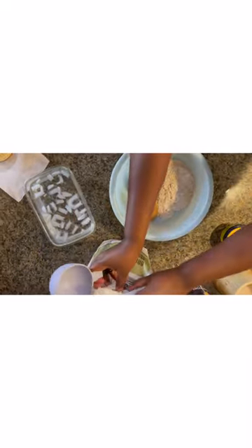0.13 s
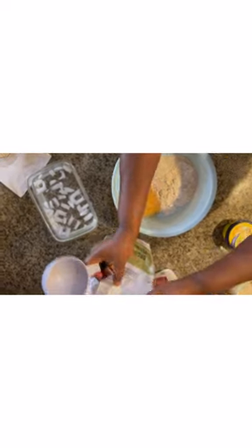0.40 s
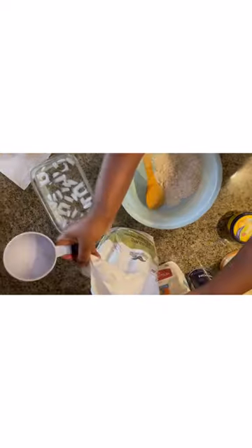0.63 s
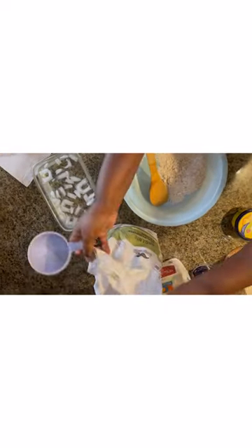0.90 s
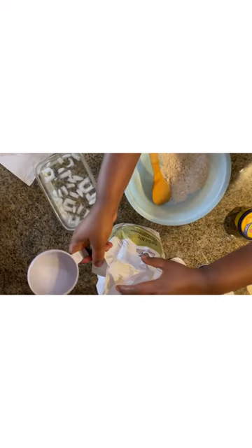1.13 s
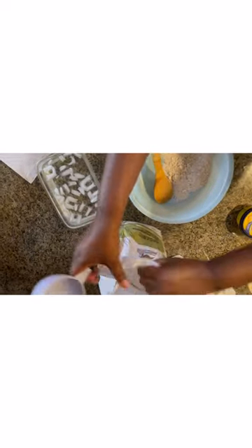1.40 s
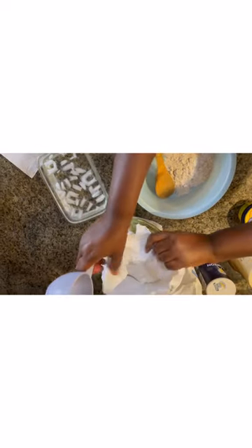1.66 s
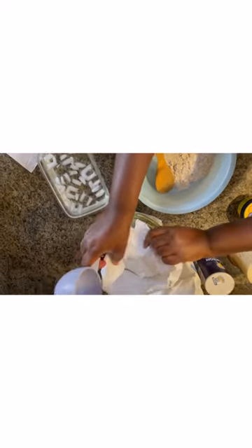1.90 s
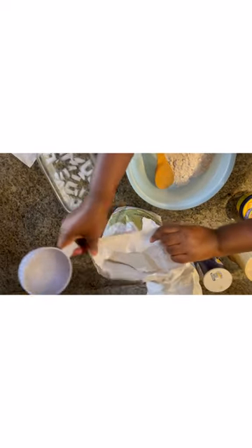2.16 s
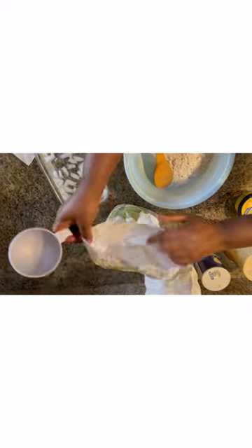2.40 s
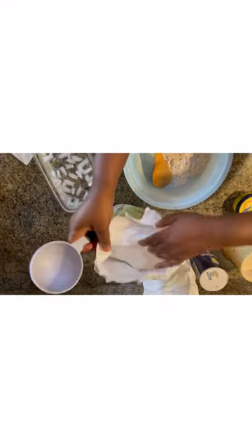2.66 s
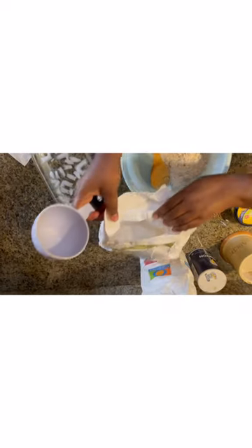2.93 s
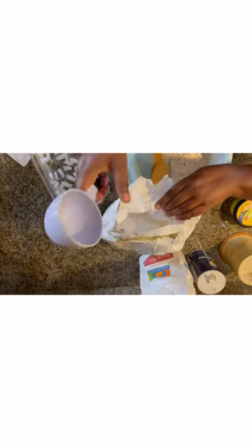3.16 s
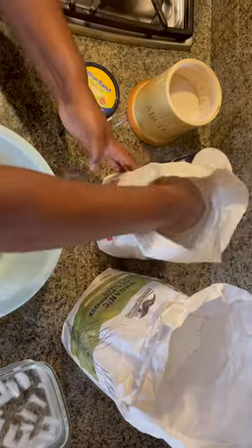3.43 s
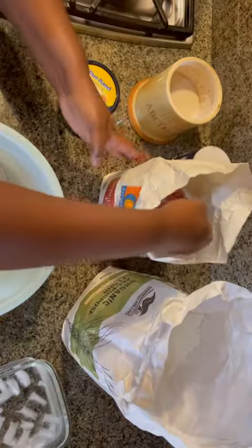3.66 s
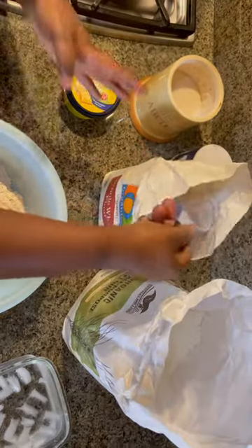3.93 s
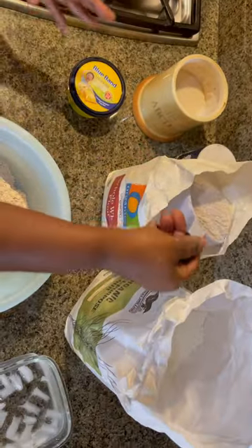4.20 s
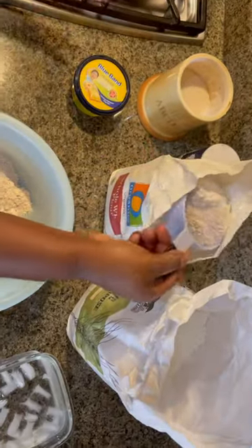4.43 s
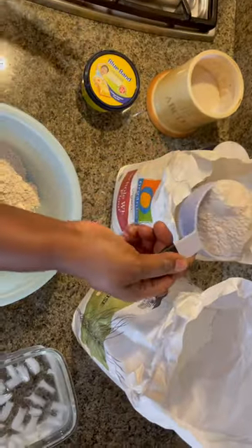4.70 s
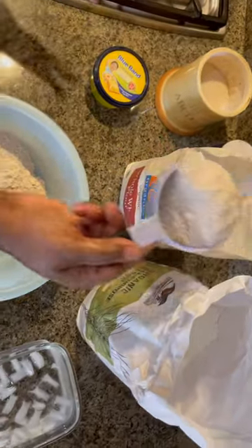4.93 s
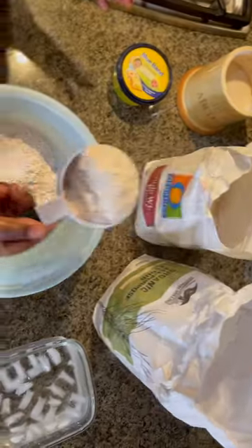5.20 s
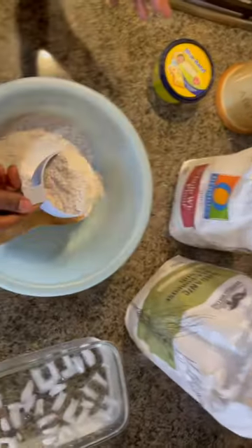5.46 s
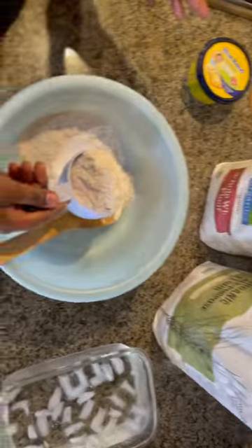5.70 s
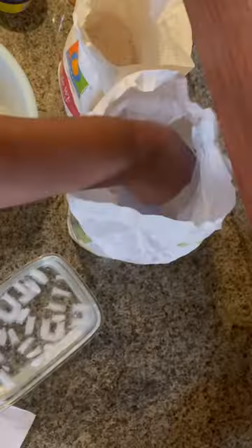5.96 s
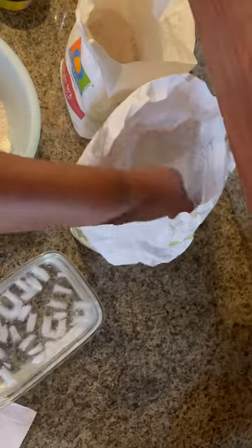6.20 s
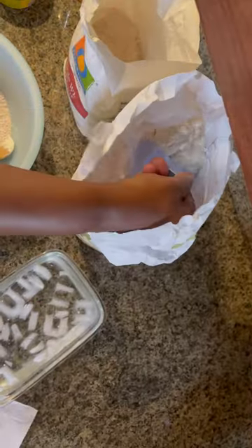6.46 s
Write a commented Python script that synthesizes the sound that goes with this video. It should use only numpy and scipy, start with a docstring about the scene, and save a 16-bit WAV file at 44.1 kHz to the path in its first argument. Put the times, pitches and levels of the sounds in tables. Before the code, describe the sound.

Close, crisp crinkling of stiff paper bags in bursts, thinning to near silence, then a brief return of rustling as a hand digs in again.

```python
"""Hands in paper flour bags

Hands open and dig into paper flour bags on a stone counter in a kitchen, in three shots joined by hard cuts.
Creases snap and panels of paper pop (brief decaying tones) over a dense rustle (noise in bands, made grainy).
A cup ticks once (a graze rings its modes), flour and fingers rub softly (puffs of noise), an appliance hums.
Faint gliding tones come and go. Two close microphone ports hear it, falling out of phase in the top octave."""
import sys
import numpy as np
from scipy import signal
from scipy.fft import rfft, irfft, next_fast_len
from scipy.io import wavfile

SR = 44100
rng = np.random.default_rng(int(sys.argv[2]) if len(sys.argv) > 2 else 0)


def field_ratio(decibels):
    """Amplitude ratio for a level in dB (20 dB per decade); scalars and array-likes work."""
    return 10 ** (np.asarray(decibels, dtype=float) / 20)


def store_pcm(level_fs):
    """Save levels as 16-bit WAV."""
    pcm = np.round(np.clip(level_fs, -1, 1) * 32767).astype(np.int16)
    wavfile.write(sys.argv[1], SR, np.atleast_2d(pcm).T)


N = 290619

CUTS_S = 3.281, 5.918   # where the second and third shot begin
TEAR_S = 0.0025   # how long the slips of one snap last
# Snaps of the paper. Each row: time in seconds, level of the crease in relative dB,
# pitch of the popping panel in Hz, level of the pop in relative dB, level of the high crack in relative dB.
SNAPS = [(0.077, -15, 153, -36, -40), (0.096, -17, 177, -24, -35), (0.138, -13.5, 990, -28.5, -34.5),
         (0.231, -24.5, 690, -49, -43.5), (0.283, -12.5, 157, -28, -27.5), (0.396, -23.5, 1060, -47, -43.5),
         (0.455, -10, 1000, -24.5, -17), (0.471, -9.5, 1020, -20, -20), (0.482, -10.5, 145, -26.5, -27.5),
         (0.53, -18.5, 287.6, -24.5, -34), (0.557, -26, 960, -23.5, -39), (0.571, -5, 980, -25.5, -20.5),
         (0.631, -18, 900, -47.5, -28), (0.639, 0, 636, -20, -22), (0.693, -5, 617, -16.5, -12),
         (0.709, -20, 580, -31, -43), (0.738, -11.5, 850, -10.5, -60), (0.86, -21, 674, -24, -65),
         (1.281, -26, 700, -28, -45.5), (1.291, -17, 680, -34, -27), (1.363, -24.5, 385, -33, -39.5),
         (1.396, -27, 603, -28.5, -62), (1.405, -25, 380, -23.5, -65), (1.425, -21, 680, -28.5, -38.5),
         (1.525, -13, 317, -26, -26.5), (1.441, -29, 448, -34.5, -47), (1.475, -45, 327, -30.5, -43),
         (1.594, -15, 1100, -32, -63), (1.609, -8, 1280, -34, -64), (1.619, -27, 890, -36, -45),
         (1.896, -24.5, 183, -29, -38), (1.947, -25, 800, -21.5, -68), (1.959, -19.5, 888, -46, -52.5),
         (1.983, -17, 377, -29, -42.5), (2.018, -26.5, 730, -27, -27.5), (2.045, -49.5, 62, -37, -66),
         (2.078, -12, 1260, -39, -43.5), (2.099, -9, 1065, -27, -40.5), (2.156, -13, 155, -28, -17),
         (2.167, -8.5, 650, -28.5, -52.5), (2.209, -20, 295, -32, -69), (2.25, -20, 686, -17.5, -51.5),
         (2.263, -9, 620, -22.5, -19), (2.496, -17.5, 490, -32, -56), (2.516, -31.5, 397, -38, -56.5),
         (2.578, -14.5, 920, -36.5, -34), (2.586, -10, 930, -25.5, -37), (2.716, -20.5, 960, -37, -40),
         (2.793, -32, 320, -34, -91), (2.807, -30.5, 687, -26.5, -96), (2.918, -12, 1060, -29, -69),
         (3.035, -38, 151.1, -45.5, -55), (3.281, -14.5, 316, -27.5, -33.5), (3.307, -7, 580, -16, -41.5),
         (3.334, -11, 1000, -19.5, -17), (3.405, -8.5, 264, -16.5, -62), (3.506, -11, 890, -31.5, -35),
         (3.562, -14.5, 660, -27, -79), (3.652, -22, 563, -33.5, -30.5), (3.679, -23, 270, -30, -83),
         (3.735, -54, 696, -42, -58), (3.883, -24, 675, -31.5, -50), (3.891, -30, 912, -39, -47.5),
         (4.25, -34, 313, -38.5, -55), (4.526, -22, 760, -43, -33), (4.544, -19, 818, -23.5, -43.5),
         (4.56, -48, 62, -41, -72), (4.317, -35, 810, -41, -51), (4.377, -47, 910, -55, -56),
         (4.718, -59, 600, -61, -57.5), (4.786, -38, 750, -66, -65), (4.854, -44.5, 196.1, -44.5, -40),
         (5.499, -45, 200, -66, -56), (5.568, -60, 158.2, -64, -65), (5.713, -42, 603, -64, -78),
         (5.856, -57.5, 239, -60, -92), (6.09, -49, 710, -49, -67), (6.179, -24, 363, -26, -67),
         (6.204, -10.5, 272, -23, -25.5), (6.28, -25, 540, -37, -75), (6.345, -42, 400.2, -36, -61),
         (6.505, -42, 690, -32.5, -58)]


def rms_one(x):
    """Scale a sound so that its average power is 1."""
    return x / np.sqrt(np.mean(x ** 2) + 1e-20)


def in_time(rows):
    """Join the rows of a table by straight lines: the first column is time, the others are returned."""
    s, *columns = np.transpose(rows)
    return [np.interp(np.arange(N) / SR, s, column) for column in columns]


def at_hz(points, hz):
    """Read a table at a pitch, on a log-frequency axis."""
    table_hz, values = np.array(points).T
    return np.interp(np.log(hz), np.log(table_hz), values)


def fade(clicks, t60):
    """Each click starts an exponential decay that falls by 60 dB in t60 seconds."""
    return signal.lfilter([1], [1, -field_ratio(-60 / (t60 * SR))], clicks + 1e-18)


def coloured(x, spectrum):
    """Smooth colouring by a table of gains in dB on a log-frequency axis."""
    size = next_fast_len(N + 4096)
    hz = np.maximum(np.fft.rfftfreq(size, 1 / SR), 1)
    return irfft(rfft(x, size) * field_ratio(at_hz(spectrum, hz)), size)[..., :N]


def drift(rate):
    """Slow chance: random values, rate of them per second, with spread 1, joined by straight lines."""
    count = int(N * rate / SR) + 2
    return np.interp(np.arange(N) * rate / SR, np.arange(count), rng.standard_normal(count))


def arch(start, length):
    """A quick swell and fade over a stretch of time, both given in seconds."""
    progress = np.clip((np.arange(N) / SR - start) / length, 0, 1)
    return np.sqrt(np.maximum(np.sin(np.pi * progress), 0))


def per_shot(versions):
    """Join three versions, one for each shot, at the cuts."""
    return np.choose(np.searchsorted(CUTS_S, np.arange(N) / SR), versions)


def air():
    """The quiet of the kitchen: coloured noise that swells a little, partly different at the two ports."""
    # Colour of the quiet. Each row: frequency in Hz, level in relative dB.
    colour = [(18, -38), (30, -6), (76, -1.5), (169, -12.5), (240, -3), (333, -27.5), (1000, -38),
              (1500, -33), (2730, -41), (4990, -35.5), (8000, -40.5), (12000, -48), (15600, -73),
              (22000, -120)]
    level_db, swell_db = -65, 2.0
    mid, side = rng.standard_normal((2, N))
    quiet = rms_one(coloured(mid + 0.51 * side * [[1], [-1]], colour))
    return field_ratio(level_db + swell_db * drift(3.0)) * quiet


def hum():
    """A low appliance drone whose pitch and level waver, nearly alike at both ports."""
    pitch_hz, wander_hz = 64.8, 8.0
    level_db, waver_db = (-58.5, -60.5, -59), 4.0   # one level for each shot
    turns = 2 * np.pi * np.cumsum(pitch_hz + wander_hz * drift(12.0)) / SR
    tone = np.sin(turns) + 0.2 * drift(9.0) * np.cos(turns) * [[1], [-1]]
    return field_ratio(per_shot(level_db) + waver_db * drift(24.0)) * rms_one(tone)


def wisps():
    """Thin tones that come and go: a gliding carrier whose strength and phase wander, as in narrow noise."""
    # Faint tones, some under the rustle, most in the quiet. Each row: start in seconds, length in seconds,
    # first pitch in Hz, last pitch in Hz, rate of wandering in Hz, level in relative dB.
    tones = [(4.98, 0.36, 5100, 4850, 180, -81), (5.002, 0.486, 1520, 1420, 70, -80),
             (4.96, 0.138, 2470, 2500, 150, -87), (5.05, 0.18, 755, 720, 50, -84),
             (5.66, 0.15, 5450, 5400, 350, -84), (4.84, 0.17, 235, 230, 30, -60),
             (4.74, 0.11, 1800, 1950, 100, -64), (4.3, 0.1, 2150, 1800, 120, -60),
             (6.21, 0.3, 2000, 1980, 60, -57.5), (4.06, 0.14, 2050, 2100, 150, -62)]
    out, t = 0, np.arange(N) / SR
    for s, length, first_hz, last_hz, width_hz, db in tones:
        glide_hz = np.interp(t, [s, s + length], [first_hz, last_hz])
        turns = 2 * np.pi * np.cumsum(glide_hz) / SR
        tone = [drift(width_hz) * np.cos(turns) + drift(width_hz) * np.sin(turns) for _ in range(2)]
        out = out + field_ratio(db + 3.0 * drift(17.0)) * arch(s, length) * np.array(tone)
    return out


def kitchen(x):
    """Room echo: eight feedback delays a side, duller on every round."""
    t60_s, wall_cut_hz = 0.16, 1600   # decay time of the low pitches; above the cut the walls absorb more
    size = next_fast_len(N + SR)
    turn = -2j * np.pi * np.fft.rfftfreq(size, 1 / SR)
    dull = 1 / (1 - turn / (2 * np.pi * wall_cut_hz))
    out = np.zeros((2, len(turn)), complex)
    for k, lag in enumerate(rng.uniform(0.0064, 0.035, 16)):   # delays in seconds
        loop = field_ratio(-60 * lag / t60_s) * dull * np.exp(turn * lag)
        out[k % 2] += loop / (1 - loop) * (-1) ** (k // 2)
    return irfft(out * rfft(x, size), size)[:, :N]


def cup():
    """A short ragged graze, not a blow, rings the modes of the cup."""
    # Modes of the cup. Each row: pitch in Hz, level in relative dB, time to fall by 60 dB in seconds.
    modes = [(3160, -39, 0.042), (4000, -30.5, 0.047), (4030, -60, 0.18)]
    tick_s, touch_s = 4.846, 0.022
    t = np.arange(SR // 2) / SR
    fading = np.exp(-t / touch_s * 2) / np.sqrt(touch_s * SR / 4)
    graze = rng.standard_normal((len(modes), len(t))) * fading
    rung = 0
    for (hz, db, t60), push in zip(modes, graze):
        ringing = field_ratio(db - 60 * t / t60) * np.sin(2 * np.pi * hz * t)
        rung = rung + signal.fftconvolve(push, ringing)[:len(t)]
    return np.interp(np.arange(N) / SR - tick_s, t, rung, 0, 0)


def grain(per_s, spread_db, t60):
    """Envelope of small creases giving way at random, sizes with a long tail; average power 1."""
    sizes = field_ratio(spread_db * np.minimum(rng.exponential(1, N), 4.5))
    return rms_one(fade(sizes * (rng.random(N) < per_s / SR), t60))


def rubs():
    """Each rub is a puff of gritty noise in a band of its own."""
    # Short rubs, probably fingers, cup and flour sliding on paper. Each row: start in seconds,
    # length in seconds, low edge in Hz, high edge in Hz, level in relative dB.
    puffs = [(0.041, 0.082, 1000, 10100, -39.5), (0.423, 0.045, 5970, 11200, -31),
             (1.034, 0.025, 1500, 9958, -55), (1.074, 0.024, 1500, 10000, -50),
             (1.434, 0.039, 3000, 10500, -39), (1.55, 0.041, 7700, 10800, -37.5),
             (1.635, 0.048, 6960, 10800, -38.5), (1.838, 0.056, 3000, 10000, -46.5),
             (2.404, 0.03, 1000, 10000, -48.5), (2.53, 0.054, 4000, 10000, -48),
             (3.024, 0.053, 6800, 10900, -44.5), (3.866, 0.039, 500, 4500, -48),
             (4.06, 0.0705, 5000, 10500, -51), (4.226, 0.055, 1800, 10000, -52.5),
             (4.319, 0.077, 1790, 9900, -50.5), (4.753, 0.089, 1000, 10000, -58),
             (4.845, 0.026, 3000, 11420, -45), (5.085, 0.022, 9000, 11000, -78.5),
             (5.228, 0.015, 5010, 9050, -76), (5.286, 0.071, 198.9, 700, -63),
             (5.32, 0.025, 4010, 4900, -78), (5.345, 0.025, 1700, 3000, -72.5),
             (5.421, 0.0315, 5507, 8500, -78), (5.58, 0.055, 604, 2600, -73.5),
             (5.626, 0.15, 4796, 6220, -81)]
    grit_share = 0.4
    grit = 1 - grit_share + grit_share * grain(per_s=580.0, spread_db=3.5, t60=0.018)
    mid, side = rng.standard_normal((2, N)) * grit
    white = mid + 0.28 * side * [[1], [-1]]
    out = np.zeros((2, N))
    for s, length, low_hz, high_hz, db in puffs:
        i, j = int(s * SR), int((s + length) * SR) + 1
        sos = signal.butter(3, [low_hz, high_hz], "band", fs=SR, output="sos")
        band = signal.sosfilt(sos, white[:, i - 1000:j])[:, 1000:]   # the filter settles before the rub
        even = np.sqrt(SR / 2 / (high_hz - low_hz))   # wide and narrow bands equally strong
        out[:, i:j] += field_ratio(db) * band * even * arch(s, length)[i:j]
    return out


def pops():
    """A panel buckles: a few cycles at a pitch of its own, swelling in about one cycle."""
    out, t = np.zeros(N + SR), np.arange(SR // 10) / SR
    turns = rng.random((len(SNAPS), 1)) * 2 * np.pi
    for (s, _, hz, pop_db, _), turn in zip(SNAPS, turns):
        cycles = 13.5 * (hz / 700) ** 0.3   # cycles until the pop has fallen by 60 dB
        swell = (1 - np.exp(-t * hz)) * field_ratio(-60 * t * hz / cycles)
        wave = swell * np.sin(2 * np.pi * hz * t + turn)
        i = round(s * SR)
        out[i:i + len(t)] += wave * field_ratio(pop_db + 5.5)
    return out[:N]


def handling():
    """Levels of body, creases and hiss as the hands move; each shot holds its first and last level up to the cut."""
    # How busy the hands are, one table for each shot. Each row: time in seconds,
    # level of the creases in relative dB, level of the sliding hiss in relative dB.
    moves = [
        [(0.0, -40.5, -44.5), (0.2, -51, -54), (0.4, -44, -36.5), (0.6, -39, -50), (0.72, -37, -38.5),
         (0.98, -54.5, -55.5), (1.14, -53.5, -47.5), (1.3, -47, -43), (1.46, -36.5, -42.5), (1.51, -50, -49),
         (1.6, -39, -39), (1.67, -49.5, -47), (1.78, -56.5, -55.5), (1.9, -47, -44.5), (2.1, -44, -53),
         (2.33, -43.5, -38.5), (2.48, -58.5, -58.5), (2.6, -46.5, -44), (2.7, -47.5, -45), (2.78, -55.5, -59),
         (2.89, -53, -50), (2.97, -51, -62.5), (3.06, -52.5, -49.5), (3.27, -65.5, -75.5)],
        [(3.3, -36.5, -46.5), (3.5, -40.5, -39), (3.73, -43, -41.5), (3.99, -50, -55), (4.09, -49.5, -46.5),
         (4.21, -50, -55), (4.3, -52, -58.5), (4.37, -45.5, -47.5), (4.41, -50.5, -51.5), (4.5, -44.5, -45.5),
         (4.68, -60, -62.5), (4.82, -54.5, -52), (4.94, -71, -67), (5.06, -79, -82.5), (5.6, -77, -90.5),
         (5.9, -93, -99.5)],
        [(5.94, -48, -47), (6.25, -54.5, -51.5), (6.45, -49, -44.5), (6.59, -41, -41.5)],
    ]
    jerk_db, jerks_per_s = 2, 17   # small jerks, heard at all pitches together
    body_base_db, body_follows, usual_crease_db = -51.5, 0.806, -49.5
    smooth_db = per_shot([np.array(in_time(rows)) for rows in moves])
    crease_db, hiss_db = smooth_db + jerk_db * drift(jerks_per_s)
    # the low body of the bag swings less than the creases
    body_db = body_base_db + body_follows * (crease_db - usual_crease_db)
    return body_db, crease_db, hiss_db


def between(hz, body_db, crease_db, hiss_db):
    """Level at a pitch, blended from the low, middle and high parts of the bag's sound."""
    low = np.clip(np.log2(900 / hz) / 0.86, 0, 1)
    high = np.clip(np.log2(hz / 1800) / 1.54, 0, 1)
    return low * body_db + high * hiss_db + (1 - low - high) * crease_db


def crinkles(body_db, crease_db, hiss_db, per_s, cycles):
    """Small facets of the sheet flick over at random, and in every snap; each rings briefly at a pitch of its own."""
    shift_db, shifts_per_s = 4.0, 7.0   # as the bag changes shape, other facets and pitches come forward
    s, peak_db, _, pop_db, crack_db = np.transpose(SNAPS)
    pitches = np.geomspace(300, 9500, 28)
    late = rng.uniform(-0.55, 0.5, (len(s), len(pitches))) * TEAR_S / 2   # facets go one after another
    at = np.round((s[:, None] + 0.001 + late) * SR).astype(int)
    shares = rng.exponential(1, (len(at), len(pitches)))
    sizes = field_ratio(1.95 * np.minimum(rng.exponential(1, N), 4.5))
    sizes = sizes * rng.choice([-1, 1], N) * (rng.random(N) < per_s / SR)
    dealt = rng.integers(0, len(pitches), N)   # which pitch each flick gets
    out = np.zeros((2, N))
    for k, hz in enumerate(pitches):
        level_db = between(hz, body_db, crease_db, hiss_db) - 6.5 + shift_db * drift(shifts_per_s)
        flicks = sizes * (dealt == k) * field_ratio(level_db)
        snap_db = between(hz, pop_db, peak_db - 14.0, crack_db) - 16.0
        flicks[at[:, k]] += shares[:, k] * field_ratio(snap_db)
        # higher facets ring for more cycles; the given count holds at 1000 Hz for a fall of 60 dB
        r = field_ratio(-60 * hz / (cycles * np.sqrt(hz / 1000) * SR))
        w = 2 * np.pi * hz / SR
        ringing = signal.lfilter([0, np.sin(w)], [1, -2 * r * np.cos(w), r * r], flicks + 1e-18)
        out += ringing * field_ratio(rng.normal(0, 1.7) * np.array([[1], [-1]]))   # facets lie at different places
    return out


def tears():
    """Each snap is a ragged run of slips around its moment: sample and share of the snap."""
    grid = np.linspace(-0.5, 0.5, 41)
    s = np.array(SNAPS)[:, [0]]
    slips = np.cos(grid * np.pi) ** 2 * rng.exponential(1, (len(s), len(grid)))
    at = np.round((s + 0.0011 + grid * TEAR_S) * SR).astype(int)
    return at, slips / slips.sum(axis=1, keepdims=True)


def paper(body_db, crease_db, hiss_db):
    """Band by band: noise under the rustle of the hands, plus a dying crack at every snap."""
    # Colour of paper as the ports hear it. Each row: frequency in Hz, gain in dB.
    colour = [(28, -23.5), (55, -13.5), (90, 0.5), (190, 1.5), (300, -4.5), (480, -9), (700, -1),
              (1100, -4.5), (2000, -5), (3000, -5), (5000, -1), (7000, -3.5), (9000, 7), (10200, -0.5),
              (11300, 2), (12200, -12.5), (13200, -37.5), (15000, -42.5)]
    # How alike left and right are. Each row: frequency in Hz, likeness from 0 to 1.
    likeness = [(100, 1), (300, 1), (700, 0.57), (1500, 0.23), (3000, 0.39), (5000, 0.42), (8500, 0.66),
                (10500, 1), (13000, 0.67)]
    # Main decay of a crack. Each row: frequency in Hz, time to fall by 60 dB in seconds.
    crack_t60 = [(300, 0.041), (1000, 0.028), (3000, 0.043), (9000, 0.014)]
    edges_hz = 85 * 2 ** np.arange(-1.6, 7.7, 0.4)
    # added to the levels of handling and of the snaps: (body, crease, hiss)
    rustle_add_db, crack_add_db = (13, 8.5, 1.88), (7, -3, 1)
    under_pop_db = 6.5   # per octave: a snap carries little sound far below the pitch of its panel
    spike_db, spike_share = 1, 0.17   # the first instant of a crack: level, share of its decay time
    give_db = 0.5   # the instant a crease gives way: one sharp pulse

    _, peak_db, pop_hz, pop_db, crack_db = np.transpose(SNAPS)
    at, slips = tears()
    middle = at[:, at.shape[1] // 2]
    signs = rng.choice([-1, 1], len(at))
    tints = rng.standard_normal((len(at), len(edges_hz)))   # every snap has its own colour
    coarse = grain(per_s=92.0, spread_db=1.5, t60=0.053)
    fine = grain(per_s=340.0, spread_db=3.0, t60=0.058)
    white, out = rng.standard_normal((2, 2, N)), 0
    for k, (low, high) in enumerate(zip(edges_hz, edges_hz[1:])):
        hz = np.sqrt(low * high)
        alike = np.clip(at_hz(likeness, hz), 0, 1)
        mid, side = white[k % 2]   # neighbouring bands use different noise
        noise = np.sqrt(1 + alike) * mid + np.sqrt(1 - alike) * side * [[1], [-1]]

        fineness = np.clip(np.log2(hz / 400) / 4, 0, 1)   # high pitches come from finer creases
        rough = 0.22 + 0.45 * ((1 - fineness) * coarse + fineness * fine)
        body_add, crease_add, hiss_add = rustle_add_db
        rustle_db = between(hz, body_db + body_add, crease_db + crease_add, hiss_db + hiss_add)
        rustle = field_ratio(rustle_db + 3.9 * drift(13.0)) * rough

        body_add, crease_add, hiss_add = crack_add_db
        snap_db = between(hz, pop_db + body_add, peak_db + crease_add, crack_db + hiss_add)
        octaves_under = np.maximum(np.log2(pop_hz / hz) - 0.7, 0)
        snap_db = snap_db + 2.4 * tints[:, k] - under_pop_db * octaves_under
        clicks = np.bincount(at.ravel(), (slips * field_ratio(snap_db)[:, None]).ravel(), N)
        give = np.bincount(middle, signs * field_ratio(snap_db + give_db), N) * np.sqrt(SR / (high - low))

        t60 = at_hz(crack_t60, hz)
        spike = field_ratio(spike_db) * fade(clicks, spike_share * t60)
        settling = field_ratio(-18.5) * fade(clicks, 8.46 * t60)   # the sheet keeps settling
        crack = spike + 0.76 * fade(clicks, t60) + settling
        band = signal.butter(2, [low, high], "band", fs=SR, output="sos")
        out = out + signal.sosfilt(band, noise * (rustle + crack) + give)
    return coloured(out, colour)


def hollow(x):
    """The air and walls of the bag lift a few narrow bands, other ones in each shot."""
    # Resonances of the open bag, one table for each shot. Each row: pitch in Hz, width in Hz,
    # level in dB over the plain sheet.
    bags = [
        [(270, 11, -5), (659.6, 68, -6.5), (978, 28, -1.5), (1720, 21, -2.5), (2130, 200, -9)],
        [(281.4, 11, 0.5), (631, 20, -7), (800, 92, -9.5), (890, 94, -5.5), (1440, 28, -15.5), (2016, 18, -8),
         (4270, 300, -7.5)],
        [(687, 80, -4), (1908, 10, -4), (4650, 280, -3)],
    ]
    lifted_shots = []
    cuts = np.ceil(np.array(CUTS_S) * SR).astype(int)
    for modes, shot in zip(bags, np.split(x, cuts, axis=1)):
        lifted = shot
        for hz, width_hz, db in modes:
            r = np.exp(-np.pi * width_hz / SR)
            push = (1 - r * r) / 2 * np.array([1, 0, -1])
            ring = [1, -2 * r * np.cos(2 * np.pi * hz / SR), r * r]
            lifted = lifted + field_ratio(db) * signal.lfilter(push, ring, shot)
        lifted_shots.append(lifted)
    return np.concatenate(lifted_shots, axis=1)


def placed(x):
    """Pan to where the bag lies, by a level difference between the ports."""
    pan_db = -1.56, 2, 1.7   # left minus right, one for each shot
    return x * field_ratio(per_shot(pan_db) * [[0.5], [-0.5]])


def scene():
    """Bags and cup in the room, over hum, air and faint tones."""
    levels = handling()
    flicks = crinkles(*levels, per_s=2500.0, cycles=23.1) + pops() + rubs()
    sos = signal.butter(4, [49.86, 11700], "band", fs=SR, output="sos")   # edges in Hz
    bag = paper(*levels) + signal.sosfilt(sos, flicks)
    near = placed(hollow(bag)) + cup()
    echo = field_ratio(-14.5) * kitchen(near.mean(axis=0))
    return near + echo + hum() + air() + wisps()


def band_limit(x):
    """A steep low-pass at the top of the band."""
    return signal.sosfilt(signal.butter(12, 16820, fs=SR, output="sos"), x)


def record(dry):
    """The two ports shift in phase against each other, by an amount that depends on pitch."""
    # Phase between the ports. Each row: frequency in Hz, lead of the left port in radians.
    port_phase = [(2000, 0), (2840, -2), (4200, -0.4), (8700, 1.08), (10300, 2.5), (11700, 1.58),
                  (14000, -1)]
    size = next_fast_len(N + 4096)
    lead = at_hz(port_phase, np.maximum(np.fft.rfftfreq(size, 1 / SR), 1))
    shifted = rfft(dry, size) * np.exp(0.5j * lead * [[1], [-1]])
    mix = irfft(shifted, size)[:, :N]
    return band_limit(mix)


dry = scene()
out = record(dry)
store_pcm(out)
```